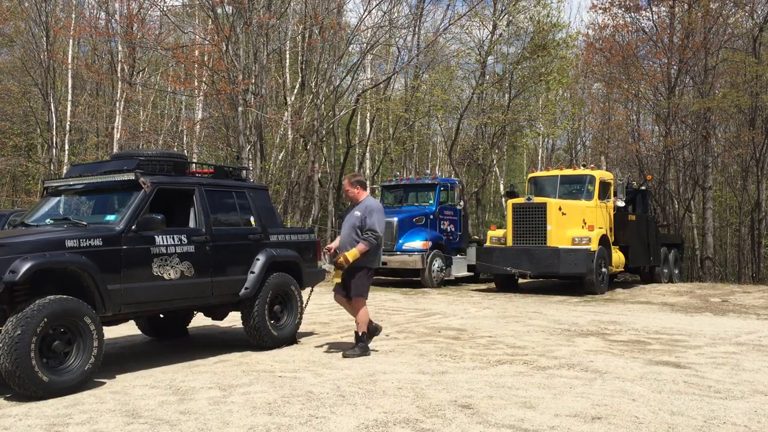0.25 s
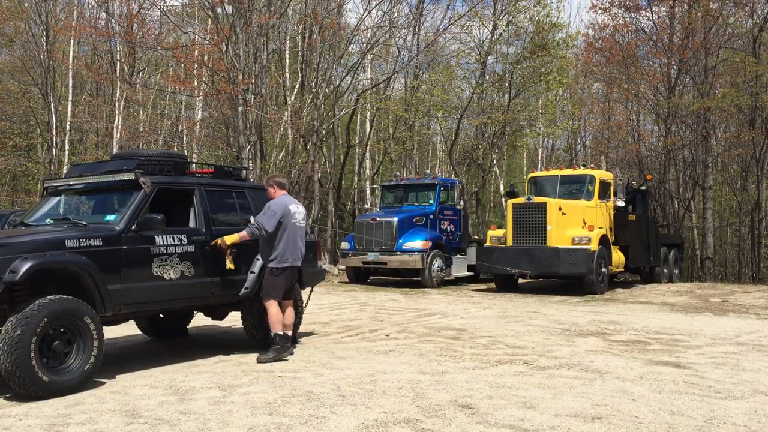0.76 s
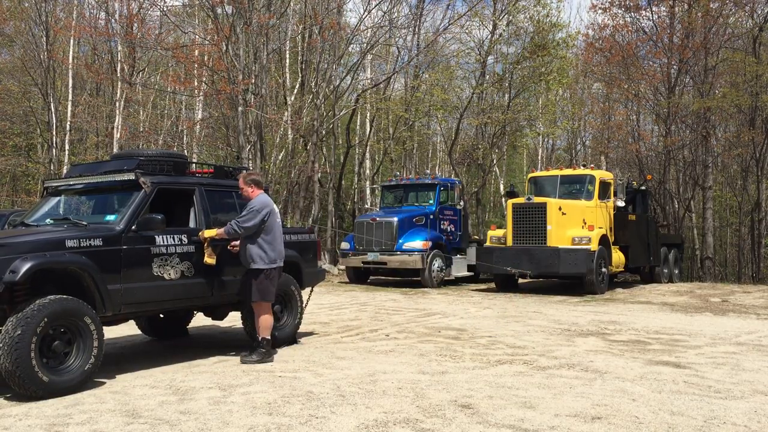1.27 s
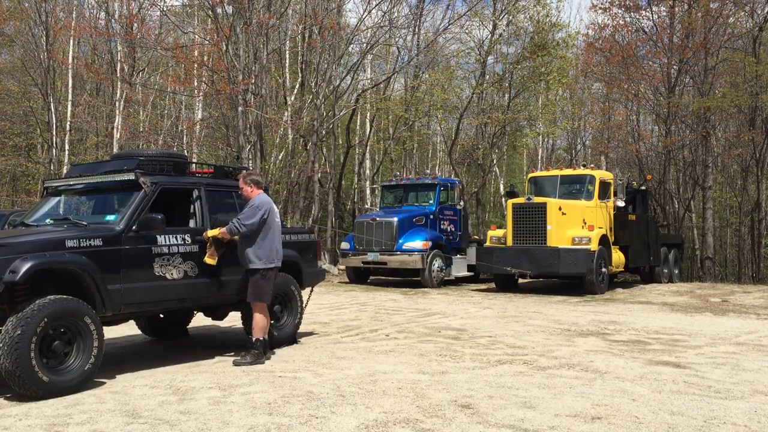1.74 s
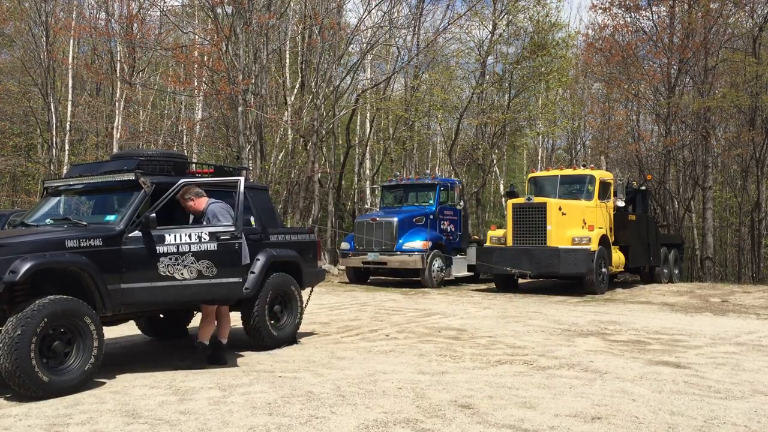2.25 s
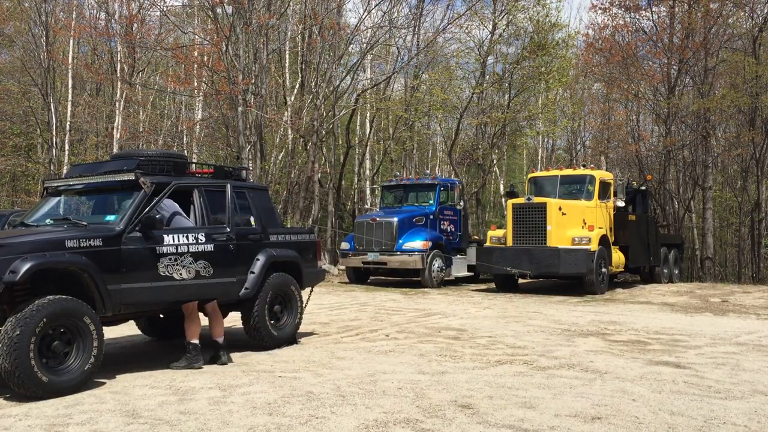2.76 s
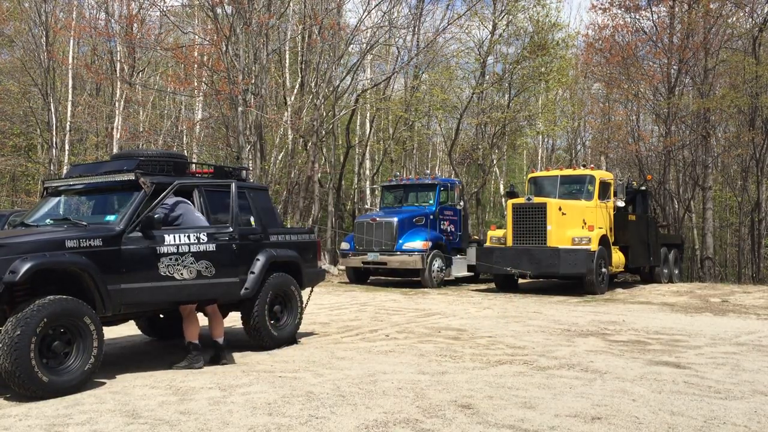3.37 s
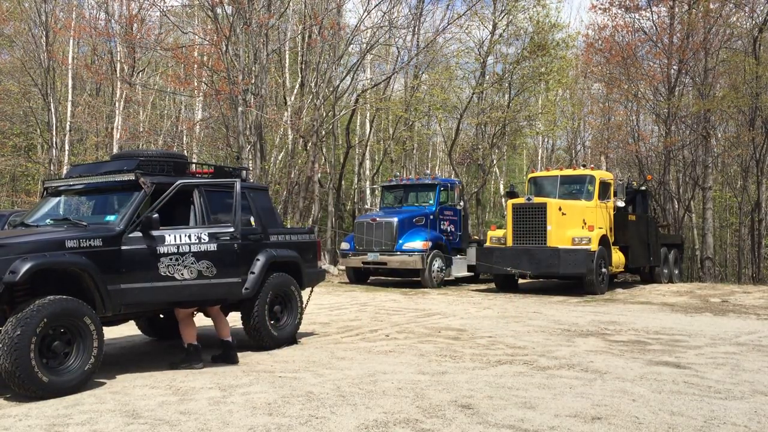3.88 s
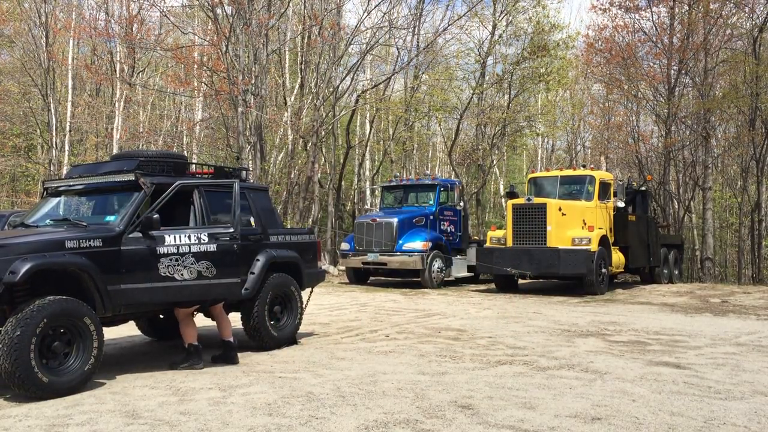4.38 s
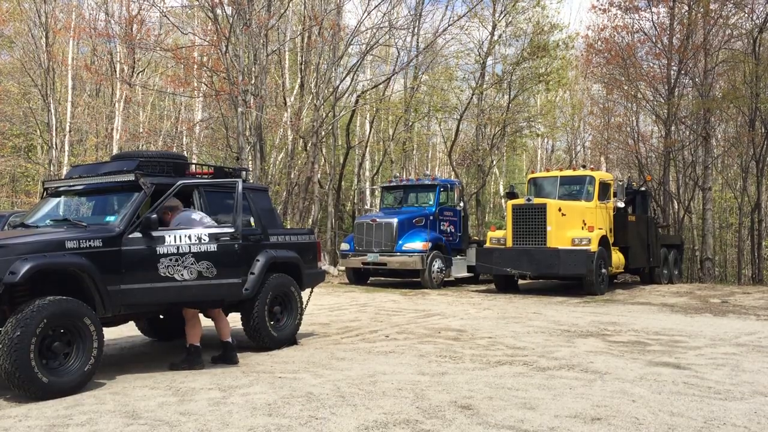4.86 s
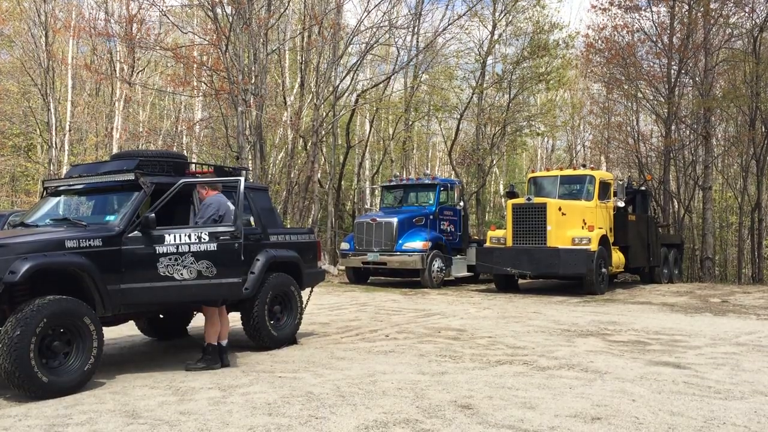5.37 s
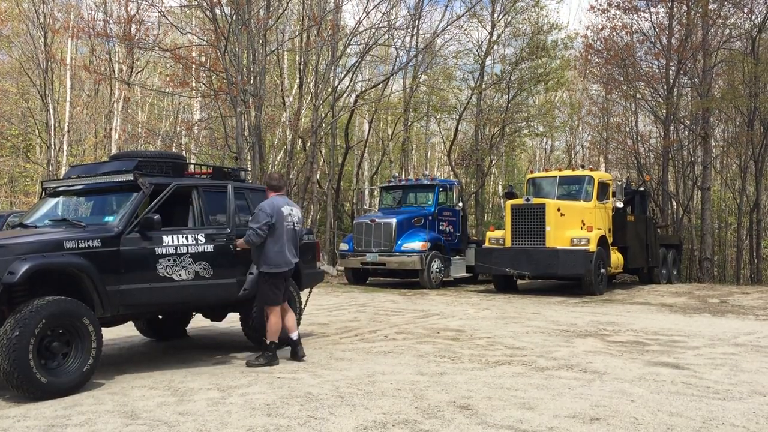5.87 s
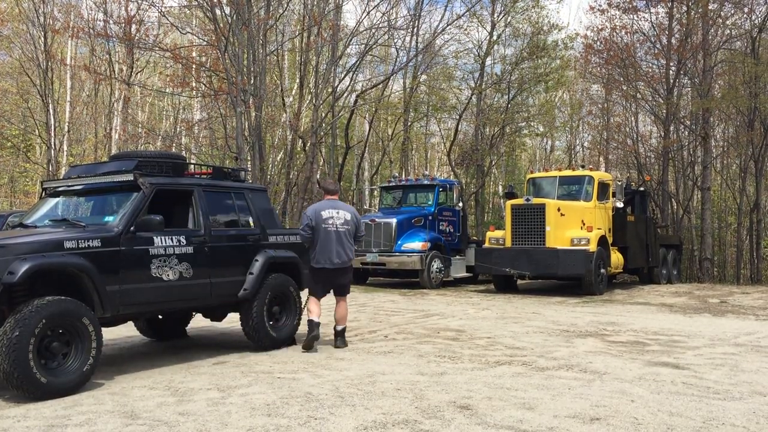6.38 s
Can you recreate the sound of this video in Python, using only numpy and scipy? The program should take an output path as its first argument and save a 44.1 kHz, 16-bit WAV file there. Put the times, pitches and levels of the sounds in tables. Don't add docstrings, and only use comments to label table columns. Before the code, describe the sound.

Diesel trucks idle steadily across a gravel clearing as a nearby car door unlatches, wind buffets the microphone, and the door slams shut.

```python
import sys
import numpy as np
from scipy import signal
from scipy.fft import rfft, irfft
from scipy.io import wavfile
from scipy.ndimage import uniform_filter1d

SR = 44100
rng = np.random.default_rng(int(sys.argv[2]) if len(sys.argv) > 2 else 0)


def store_wav(level_fs):
    pcm = np.round(np.clip(np.atleast_2d(level_fs), -1, 1) * 32767)
    wavfile.write(sys.argv[1], SR, pcm.T.astype(np.int16))


def invert_db(level):
    return 10 ** (np.asarray(level, dtype=float) / 20)


N = 292383
T = np.arange(N) / SR
MS = np.arange(0, N / SR + 1, 1 / 1000)


def curve(table, column):
    rows = np.array(table)
    return np.interp(T, rows[:, 0], rows[:, column])


def bumps(rows):
    return np.interp(T, MS, sum(height * np.exp(-((MS - s) / length) ** 2) for s, height, length in rows))


def walk(rate):
    hold = int(SR / rate)
    levels = np.repeat(rng.standard_normal(N // hold + 1), hold)
    return unit(uniform_filter1d(uniform_filter1d(levels, hold), hold)[:N])


def unit(x):
    return x / np.sqrt(np.mean(x ** 2))


def noise():
    return rng.standard_normal(N)


def band(x, hz, width):
    return signal.lfilter(*signal.iirpeak(hz, hz / width, fs=SR), x)


def colour(x, points):
    hz, db = np.transpose(points)
    f = np.maximum(np.arange(N // 2 + 1) * SR / N, 1)
    return irfft(rfft(x) * invert_db(np.interp(np.log(f), np.log(hz), db)), N)


def burst(s, rise, fall):
    u = np.clip(T - s, 0, 30 * fall)
    return (1 - np.exp(-u / rise)) * np.exp(-u / fall)


def snaps(rows, gain_db, fall):
    jumps = np.zeros(N)
    for s, db in rows:
        jumps[int(s * SR)] = invert_db(db + gain_db)
    return signal.lfilter([1], [1, -np.exp(-1 / (fall * SR))], jumps)


# f/Hz, level per Hz/dB
ROAR_COLOUR = [(76, -29), (130, -8), (165, -10.5), (270, -17.5), (385, -26.5), (520, -29), (750, -26),
               (1310, -25.5), (2100, -28.5), (3500, -31), (4930, -44), (6400, -43), (9400, -51.5),
               (15800, -65.5)]
# t/s, rustle level/dB, roar level/dB
BREEZE = [(0, 0.5, -47), (.6, -2, -46), (1.3, -0.5, -47.5), (1.6, -3, -47.5), (2.35, -0.5, -47),
          (2.65, 0, -47.5), (2.95, 3, -46.5), (3.5, -1, -48), (4.05, 0, -45.5), (4.4, -0.5, -48),
          (4.85, 0, -45), (5.4, -1.5, -47.5), (6.63, -0.5, -46.5)]


def roar():
    out, swell = 0, walk(7)
    leaves_db = curve(BREEZE, 1)
    for hz in 130 * 2. ** np.arange(7):
        top = hz > 8000
        edges = [hz / 2 ** .5, hz * 2 ** .5 * (1 + top * 0.84)]
        octave = signal.sosfilt(signal.butter(2, edges, "band", fs=SR, output="sos"), noise())
        out = out + invert_db(0.83 * swell + 1.06 * walk(20) + top * leaves_db) * octave
    return invert_db(curve(BREEZE, 2) + 2.5) * unit(colour(out, ROAR_COLOUR))


# t/s, level/dB
WIND_RUMBLE = [(0, -44), (1.5, -46.5), (3.7, -46.5), (4.0, -42), (4.5, -38.5), (4.75, -35), (5.5, -29),
               (6.05, -33), (6.35, -45), (6.63, -32.5)]
# t/s, change/dB, length/s
WIND_PUFFS = [(.01, 0, 0.026), (.33, 1, 0.043), (.7, 1, .06), (1.03, 7.5, 0.024), (1.79, 8, 0.031),
              (2.07, 8.5, 0.057), (2.46, 4.5, 0.038), (2.59, 6, 0.029), (2.9, -6, .03), (3.25, 5.5, .04),
              (3.4, -9, .05), (3.52, 5, 0.05), (3.77, -11, .04), (4.66, 1, 0.048), (4.82, -2, 0.035),
              (5.0, -3, 0.029), (5.07, -5, 0.033), (5.19, -3, 0.018), (5.25, -6, 0.017), (5.37, -3, 0.035),
              (5.505, -4, 0.014), (5.67, -8.5, 0.072), (5.85, -8, 0.048), (6.17, 2, .04), (6.29, 5, .03),
              (6.4, -8, 0.039)]
# t/s, peak level/dB, f/Hz
SUCKING_EDDIES = [(4.569, -41, 103), (4.691, -17, 128), (5.145, -12, 126), (5.218, -24, 109),
                  (5.286, -12.5, 83.5), (5.314, -10, 65), (5.450, -12, 110), (5.463, -14, 82),
                  (5.527, -16, 145), (5.553, -13.5, 60), (5.582, -10, 84), (5.606, -18.5, 83.5),
                  (5.899, -16, 95), (5.939, -22, 56), (5.979, -18, 72), (6.004, -13.5, 121),
                  (6.600, -20, 111)]
# t/s, peak level/dB, f/Hz
EDDY_SLAPS = [(4.898, -22, 220), (4.907, -18, 201), (4.935, -24, 219), (5.144, -19, 191), (5.168, -24, 200),
              (5.27, -15.5, 212), (5.453, -31, 260), (5.475, -25.5, 300), (5.535, -30, 260),
              (5.539, -15, 327), (5.566, -25, 240), (5.984, -27, 220), (6.004, -17, 188), (6.009, -26, 236),
              (5.887, -31, 190), (5.957, -28, 180), (5.967, -29, 199), (5.993, -23, 130), (6.046, -28, 170),
              (6.093, -25.5, 200), (6.078, -24, 80), (6.003, -40, 650), (.14, -34, 250), (.81, -29, 180),
              (2.05, -41, 170), (2.95, -35, 190)]
# t/s, peak level/dB, f/Hz
PRESSING_EDDIES = [(4.663, -18, 70), (4.912, -7.5, 115), (5.031, -22.5, 94), (5.109, -21, 106),
                   (5.168, -12.5, 115), (5.236, -20, 150), (5.28, -15, 85), (5.306, -14, 90),
                   (5.325, -14.5, 80), (5.428, -18, 147), (5.469, -8.5, 85), (5.47, -18, 300),
                   (5.484, -15.5, 160), (5.947, -22, 50), (5.973, -14.5, 100), (5.988, -16, 70),
                   (6.000, -25, 130)]


def wind():
    level_db = curve(WIND_RUMBLE, 1) + bumps(WIND_PUFFS)
    lumps = invert_db(1.24 * walk(30)) * noise()
    low = unit(colour(lumps, [(15, -7.0), (30, 13.0), (60, 15.0), (90, 12.0), (140, -3.5), (300, -61),
                              (1000, -130)]))
    high = unit(colour(lumps, [(30, -39), (60, -12.5), (130, -0.5), (220, -7.0), (400, -22.0), (800, -53),
                               (2000, -130)]))
    out = invert_db(level_db) * low + invert_db(-38.5 + 1.15 * (level_db + 34.0)) * high
    wake = bumps([(s, invert_db(db - 29), .014) for s, db, _ in SUCKING_EDDIES + PRESSING_EDDIES])
    out += wake * (high + 2.0 * low)
    sucks = SUCKING_EDDIES + EDDY_SLAPS
    signs = [1] * len(sucks) + [-1] * len(PRESSING_EDDIES)
    tilts = rng.standard_normal(80)
    for (s, db, hz), sign, tilt in zip(sucks + PRESSING_EDDIES, signs, tilts):
        near = slice(int((s - .05) * SR), int((s + .05) * SR))
        u = (T[near] - s) * hz
        swing = np.cos(2 * np.pi * u + 0.32 * tilt + 0.22 * np.sin(2 * np.pi * u))
        out[near] -= sign * invert_db(db - 2.0) * np.exp(-(u / 0.52) ** 2) * swing
    return out


def clearing(x):
    u = T[:SR // 3]
    tail = signal.lfilter([.3], [1, -.7], rng.standard_normal(len(u))) * np.exp(-u / 0.044) * (u > .012)
    return x + invert_db(-47.5) * signal.fftconvolve(x, tail)[:N]


# t/s, peak level/dB, f/Hz, length/s
BOOTS = [(0.416, -54, 5800, 0.0065), (.418, -65.5, 10000, .01), (0.423, -43, 1300, 0.025),
         (0.575, -45, 2300, 0.023), (0.576, -72, 6500, 0.019), (0.636, -58, 6000, .005),
         (3.665, -49.5, 2500, 0.054), (5.14, -53, 3300, 0.015), (6.162, -26.5, 700, 0.012),
         (6.165, -53, 1600, .025), (6.171, -45, 900, 0.034), (6.177, -45, 1600, 0.046),
         (6.598, -61, 14500, .005), (3.297, -60, 9000, .003), (4.848, -65, 9530, .012),
         (.981, -62, 9000, .004)]
# t/s, peak level/dB, f/Hz, length/s
CATCH_CLICKS = [
    (1.698, -46, 1100, .012),
    (1.704, -43, 1500, .008),
    (1.711, -50, 2400, .01),
    (1.7662, -40, 1700, .004),
    (1.770, -55, 7500, .004),
    (1.771, -41, 1000, .006),
    (1.778, -47, 4000, .005),
    (1.779, -35.5, 1300, .009),
    (1.793, -45, 1000, .005),
]


def steps_and_catch():
    white = noise()
    grit = white * invert_db(1.4 * rng.standard_normal(N // 40 + 1).repeat(40)[:N])
    out = np.zeros(N)
    for s, db, hz, length in BOOTS + CATCH_CLICKS:
        tone = unit(band(band(grit, hz, 1.15 * hz), hz, hz))
        out += invert_db(db) * burst(s, 0.018 * length, length) * tone
    return out


# f/Hz, t60/s, level/dB
HANDLE_MODES = [(255, 0.083, -21), (328, .07, -42), (421, 0.073, -29), (548, 0.064, -30), (864, .05, -39),
                (1150, 0.065, -37), (1325, 0.076, -35)]


def handle(start_s):
    out, start = np.zeros(N), int(start_s * SR)
    u = T[:SR // 4]
    thud = sum(invert_db(db - 60 * u / t60) * np.sin(2 * np.pi * hz * u) for hz, t60, db in HANDLE_MODES)
    out[start:start + len(u)] = thud * np.minimum(u / 0.0034, 1)
    return out


# f/Hz, t60/s, level/dB
DOOR_MODES = [(185, 0.1, 5), (260, 0.075, 0.5), (425, 0.08, -5), (527, 0.082, -7.5), (589, 0.058, -3.5),
              (650, 0.045, -1.5), (735, 0.09, -3), (911, 0.079, 6.5), (1312, 0.11, 1.5), (1400, 0.054, -15),
              (1730, 0.077, -1), (2000, 0.075, 7.5), (2390, 0.084, 3.5), (2770, .06, -8), (3280, 0.046, 7),
              (4100, .05, -8), (5930, 0.035, -3)]
# f/Hz, level per Hz/dB
RATTLE_COLOUR = [(410, -6.5), (700, -3.5), (1600, -7), (1980, -2), (2230, -14), (3600, -9.5), (4900, -16.5),
                 (5900, -13.5), (15800, -38.5)]


def door(blows, ring):
    force, shake = np.full(N, 1e-18), 0
    for s, db, push, rattle_db in blows:
        shape = np.hanning(int(push * SR) + 3)
        i = int(s * SR)
        force[i:i + len(shape)] += invert_db(db) * shape / shape.sum()
        shake = shake + invert_db(rattle_db) * burst(s, 0.00045, 0.0044)
    out = shake * unit(colour(noise(), RATTLE_COLOUR))
    for (hz, t60, db), side in zip(DOOR_MODES, rng.choice([-1, 1], len(DOOR_MODES))):
        pole = np.exp(2j * np.pi * hz / SR - np.log(1000) / (ring * t60 * SR))
        out += side * invert_db(db - 2.5) * signal.lfilter([1], [1, -pole], force).imag
    return out


# t/s, level/dB, push/s, rattle level/dB
LATCH_BLOWS = [
    (1.7665, -33.5, 0.00096, -53),
    (1.770, -28.5, 0.0026, -51),
    (1.777, -33, 0.0019, -50),
    (1.782, -50, .0008, -50),
    (1.787, -29, 0.0023, -60),
]


def unlatch():
    return door(LATCH_BLOWS, 0.33) + handle(LATCH_BLOWS[0][0])


# t/s, level/dB, push/s, rattle level/dB
SLAM_BLOWS = [
    (6.1443, -40, 0.0006, -34),
    (6.1462, -38, 0.0003, -23.5),
    (6.148, -40, 0.00024, -23),
    (6.150, -33, 0.00022, -19),
    (6.1515, -22, 0.00045, -20.5),
    (6.155, -22, 0.00066, -24),
    (6.158, -12, 0.0038, -32),
    (6.162, -24, 0.0012, -44),
    (6.168, -19.5, 0.0032, -46),
    (6.176, -31, 0.0011, -48),
]


def slam():
    return door(SLAM_BLOWS, 0.69)


# t/s, f/Hz, level/dB
FAN_TONE = [(0, 330, -67), (.27, 325.3, -47.5), (.45, 322, -55), (.68, 328, -46), (.9, 326.2, -58),
            (1.1, 335.7, -50), (1.4, 319.7, -56.5), (2.15, 326.8, -53.5), (2.6, 315, -52),
            (3.0, 320.5, -56), (3.27, 324, -51.5), (3.65, 328, -49), (3.88, 329, -61), (4.05, 333.7, -48),
            (4.3, 328, -50), (4.55, 318, -53), (5.6, 322, -58.5), (6.63, 326.1, -50)]


def fan():
    phase = 2 * np.pi * np.cumsum(curve(FAN_TONE, 1)) / SR
    return invert_db(curve(FAN_TONE, 2) + 1.5 * walk(6.1)) * np.sin(phase + 1.27 * walk(11))


# t/s, lag/turns
GOVERNOR_LAG = [(0, 0.6), (.5, 0.33), (1.3, 0.26), (2.3, 0.16), (2.7, 0.21), (3.4, 0.36), (3.9, 0.42),
                (4.4, 0.24), (4.85, 0.077), (5.3, -0.25), (5.85, 0.18), (6.63, 0.2)]
# f/Hz, width/Hz, level/dB
BLOCK_MODES = [(316.4, 41, -54), (1094, 120, -58.5), (1338, 176, -54.5), (1600, 89, -60.5), (1887, 99, -59),
               (2433, 29, -65.5), (3247, 170, -60.5), (3624, 54, -67.5), (4434, 100, -71.5)]
# t/s, peak level/dB
BLOCK_KNOCKS = [(0.0692, -39), (0.2259, -44), (0.3022, -52), (0.378, -47), (0.406, -47), (0.4579, -42),
                (0.4818, -41), (0.6863, -44), (0.8425, -46), (1.0211, -43), (1.0952, -44), (1.1263, -46),
                (1.2226, -45), (1.3918, -45), (1.6657, -46), (1.695, -46), (1.7639, -42), (1.9984, -42),
                (2.2807, -43), (2.4199, -47), (2.5311, -46), (2.6239, -48), (2.694, -49), (2.7212, -46),
                (2.833, -40), (2.9008, -46), (2.9188, -43), (2.9578, -49), (3.1133, -43), (3.1323, -46),
                (3.483, -47), (3.5224, -46), (3.5454, -45), (3.5922, -42), (3.6282, -45), (3.6566, -44),
                (3.803, -42), (3.8372, -38), (3.936, -43), (4.136, -46), (4.341, -44), (4.3705, -48),
                (4.3931, -44), (4.596, -46), (4.9402, -43), (5.1472, -45), (5.3777, -45), (5.5657, -47),
                (5.7818, -44), (6.0033, -48)]
# t/s, peak level/dB
COVER_KNOCKS = [(0.1371, -38), (0.1625, -35), (0.2044, -33), (0.5666, -37), (0.5791, -33), (0.6205, -37),
                (0.773, -34), (0.8819, -37), (1.0974, -40), (1.1827, -35), (1.2296, -39), (1.5384, -38),
                (1.7669, -32), (1.8402, -37), (2.165, -43), (2.5371, -39), (2.8903, -43), (3.2041, -36),
                (3.5054, -40), (3.6451, -47), (3.6566, -37), (3.7309, -35), (3.8157, -29), (3.8386, -38),
                (3.8661, -43), (3.8866, -37), (4.0168, -40), (4.2772, -43), (4.4233, -38), (4.5251, -38),
                (4.6022, -37), (4.6309, -40), (4.6818, -36), (4.8404, -30), (4.8843, -38), (5.0769, -42),
                (5.2265, -43), (5.2804, -39), (5.438, -36), (6.0651, -40)]
# f/Hz, width/Hz, level/dB
VALVE_MODES = [(6280, 220, -72), (5600, 400, -79), (3500, 400, -70), (4400, 300, -73.5)]
# t/s, peak level/dB
VALVE_SNAPS = [(0.0204, -55), (0.2259, -59), (0.2793, -58), (0.416, -50), (0.533, -57), (0.6384, -53),
               (0.8924, -51), (0.9457, -52), (1.1503, -54), (1.3049, -49), (1.3565, -52), (1.6092, -64),
               (1.7674, -63), (1.8178, -64), (1.922, -59), (2.1251, -60), (2.1828, -54), (2.2283, -53),
               (2.3321, -52), (2.4358, -54), (2.5381, -52), (2.7955, -51), (2.8771, -57), (2.9542, -51),
               (3.1108, -51), (3.1622, -52), (3.3188, -51), (3.4251, -57), (3.4715, -55), (3.5754, -52),
               (3.6277, -59), (3.6501, -56), (3.9365, -50), (3.9694, -58), (4.0385, -55), (4.0897, -54),
               (4.1386, -52.5), (4.3415, -54), (4.3924, -50), (4.5481, -62), (4.5979, -58), (4.6493, -50.5),
               (4.7351, -51), (4.8449, -54), (5.0439, -56), (5.1472, -53), (5.2754, -61), (5.3571, -55),
               (5.462, -54), (5.5099, -56), (5.7339, -58), (5.8331, -55), (5.8845, -57), (5.9334, -54),
               (6.4544, -50),
    (6.4888, -56),
    (6.5407, -60),
    (6.5606, -59),
    (6.612, -57),
]


def engine():
    crank_hz = 19.4
    turns = crank_hz * T - curve(GOVERNOR_LAG, 1) + 2
    chance = np.clip(rng.standard_normal((500, 3)), -2, 1.5)
    knock = invert_db(4.5 * chance[(3 * turns).astype(int), 0]) * np.exp(-(3 * turns % 1) / .4)
    dull = snaps(COVER_KNOCKS, 42, 0.0039)
    bright = snaps(BLOCK_KNOCKS, 52.5, 0.0039)
    out = np.zeros(N)
    for hz, width, db in BLOCK_MODES:
        hard = bright if hz > 2200 else dull * (hz > 500)
        hits = 1 + .45 * knock + hard
        out += invert_db(db + 1.3 * walk(25)) * unit(band(hits * noise(), hz, width))
    snap = invert_db(-5 + 1.8 * chance[turns.astype(int), 1]) * np.exp(-(turns % 1) / 0.19)
    snap = np.maximum(snap, snaps(VALVE_SNAPS, 56, .006))
    late = turns + .5
    snap += invert_db(-16.5 + 2.5 * chance[late.astype(int), 2]) * np.exp(-(late % 1) / 0.073)
    for hz, width, db in VALVE_MODES:
        out += invert_db(db) * unit(band(band(snap * noise(), hz, width), hz, 3 * width))
    return out


# t/s, f/Hz, level/dB
EXHAUST_DRONE = [(0, 117.2, -31.5), (.4, 116.3, -31), (1.4, 115.7, -31), (2.1, 116.3, -29.5),
                 (2.5, 116.3, -35.5), (2.75, 115.1, -30.5), (3.4, 116, -30), (3.65, 116.2, -29),
                 (4.5, 116.8, -34), (5.2, 115.6, -37), (5.8, 114.6, -33), (6.2, 115.3, -29.5),
                 (6.63, 114.7, -30)]
# multiple, level under the drone/dB, wander/dB
FIRING_ORDERS = [(1, -23.5, 1.5), (3, -23.5, 4.5), (4, -26.5, 1.5)]
# t/s, depth/dB, length/s, slip/cycles
AIR_FADES = [(0.172, -4.5, 0.1, 0.0067), (0.257, -6.5, 0.056, 0.49), (0.547, -4, 0.037, 0.11),
             (0.697, -6.5, 0.067, 0.47), (1.053, -9.5, 0.063, -0.2), (1.31, -3.5, 0.061, 0.068),
             (1.58, -7.5, 0.067, 0.16), (1.798, -7, 0.048, 0.1), (2.03, -7.5, 0.12, -0.16),
             (2.163, -5, 0.026, -0.26), (2.424, -3, 0.12, 0.028), (2.46, -7, 0.014, 0.41),
             (3.11, -5, 0.03, 0.055), (3.488, -12, 0.018, 0.51), (3.592, -6.5, 0.12, 0.016),
             (4.06, -12, 0.11, 0.0042), (4.267, -6, 0.059, -0.22), (4.796, -5, .07, 0.25),
             (5.503, -4, .02, 0.019), (5.67, -2.5, 0.044, -0.086), (5.99, -11, 0.075, 0.057),
             (6.274, -3.5, 0.026, 0.19)]


def exhaust():
    firing = np.pi * np.cumsum(curve(EXHAUST_DRONE, 1)) / SR
    slips = [np.pi * cycles * np.tanh((MS - s) / (0.38 * length)) for s, _, length, cycles in AIR_FADES]
    slip = np.interp(T, MS, sum(slips))
    fade_db = bumps([row[:3] for row in AIR_FADES])
    level_db = curve(EXHAUST_DRONE, 2) + fade_db + 0.53 * walk(18)
    out = invert_db(level_db) * np.sin(2 * firing + slip + 0.045 * walk(18))
    for multiple, db, wander_db in FIRING_ORDERS:
        out += invert_db(-33.0 + db + wander_db * walk(6)) * np.sin(multiple * firing + 1.2 * walk(5))
    return np.sqrt(2) * out


def scene():
    near = unlatch() + slam() + steps_and_catch()
    trucks = exhaust() + fan() + engine()
    return (trucks + roar() + clearing(near) + wind())[None]


def band_limit(x):
    return signal.sosfilt(signal.butter(12, 15770, fs=SR, output="sos"), x)


# f/Hz, width/Hz, depth/0-1
CASE_NOTCH = (10470, 570, 0.54)


def record(dry):
    limit_db, squeeze, recover_s = -33, 0.14, 0.027
    keep = np.exp(-1 / (recover_s * SR))
    loud = np.sqrt(signal.lfilter([1 - keep], [1, -keep], dry ** 2))
    dry = dry * np.maximum(loud / invert_db(limit_db), 1) ** -squeeze
    dry = dry - CASE_NOTCH[2] * band(dry, *CASE_NOTCH[:2])
    treble = signal.sosfilt(signal.butter(2, 900, "high", fs=SR, output="sos"), dry)
    ripple = .13 * np.cos(2 * np.pi * (np.arange(N) / 256 + .3))
    top_cut = signal.ellip(8, .2, 70, 15650, fs=SR, output="sos")
    mix = signal.sosfilt(top_cut, dry + ripple * treble)
    return band_limit(mix)


dry = scene()
out = record(dry)
store_wav(out)
```